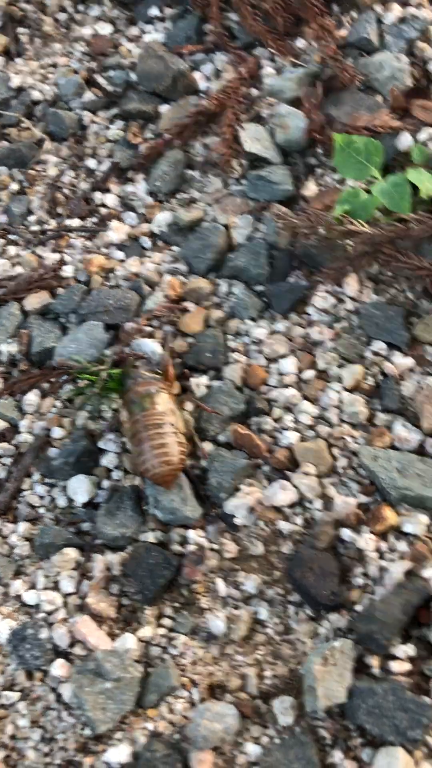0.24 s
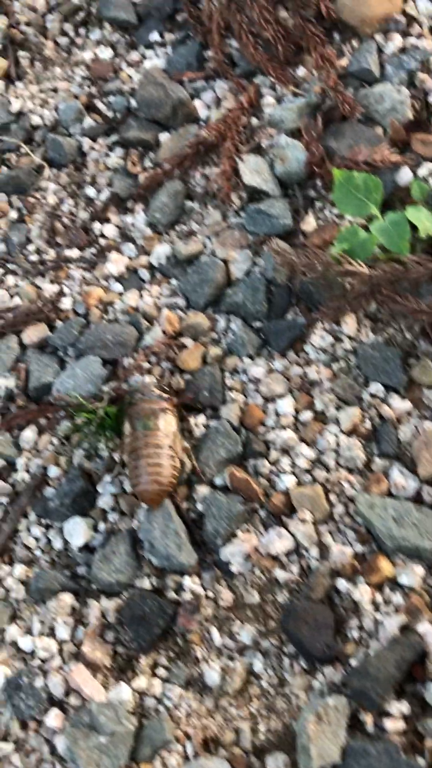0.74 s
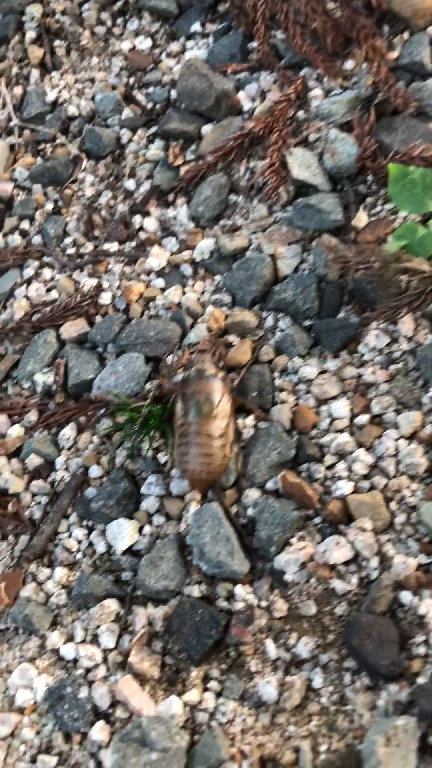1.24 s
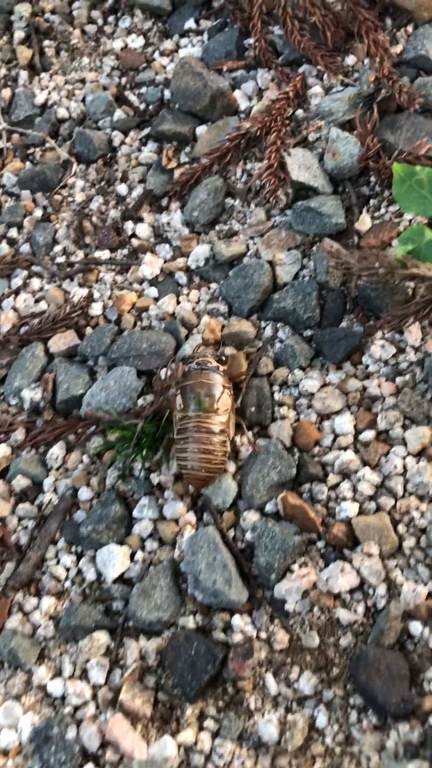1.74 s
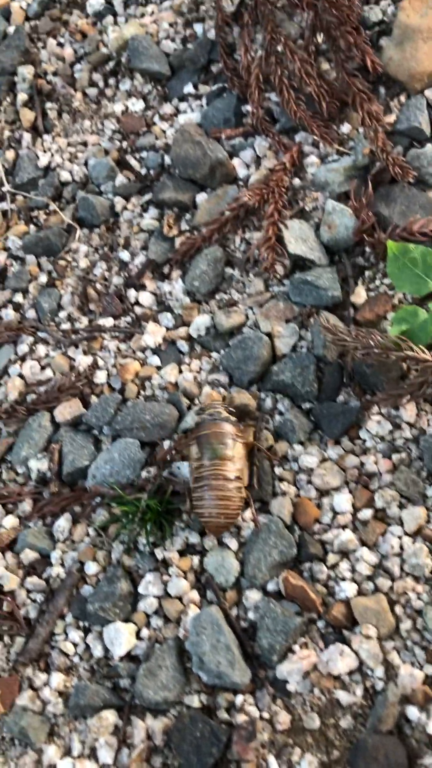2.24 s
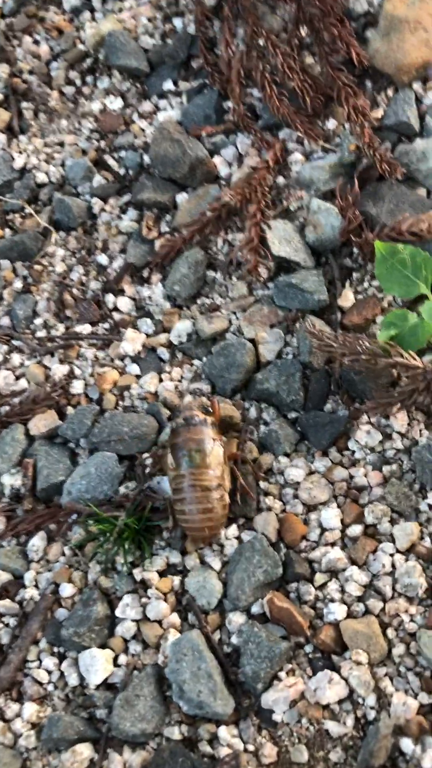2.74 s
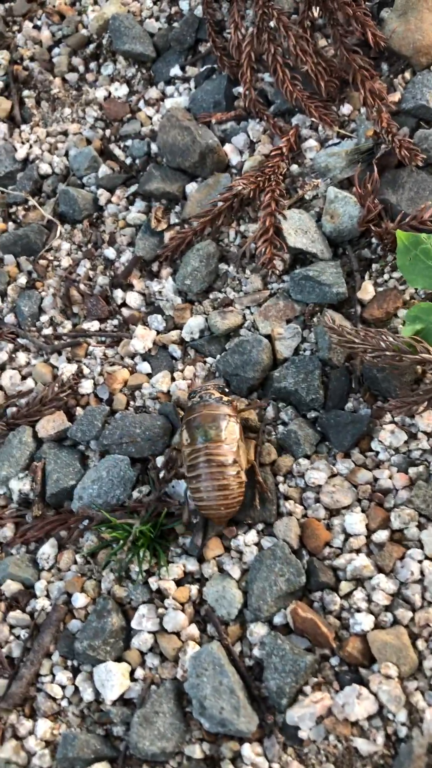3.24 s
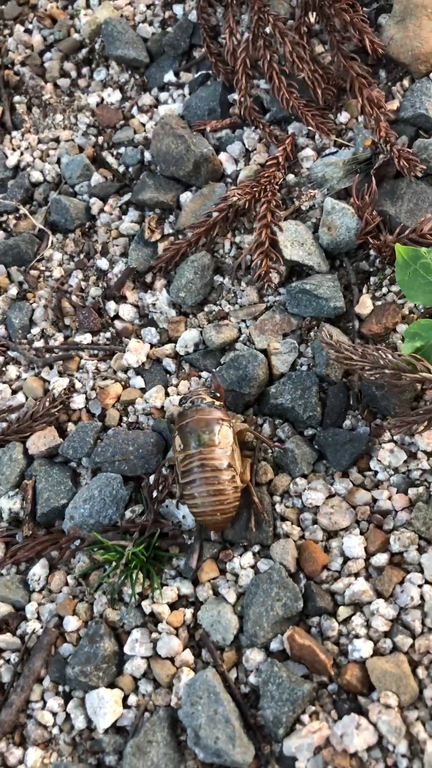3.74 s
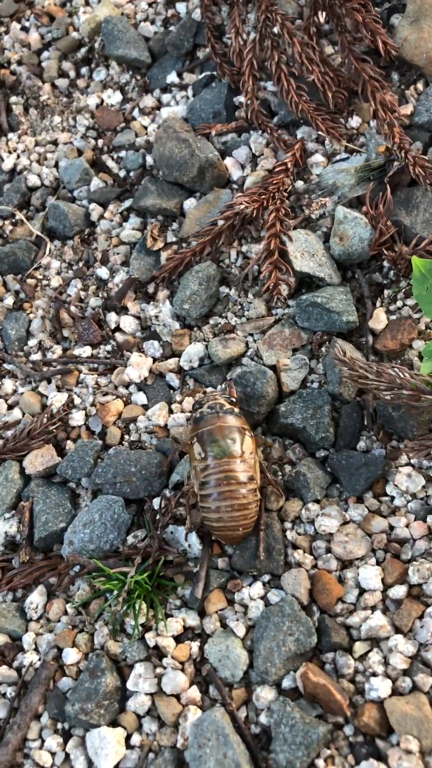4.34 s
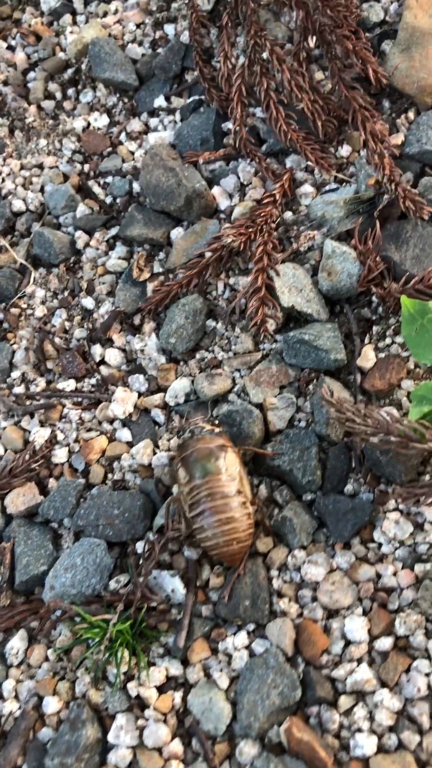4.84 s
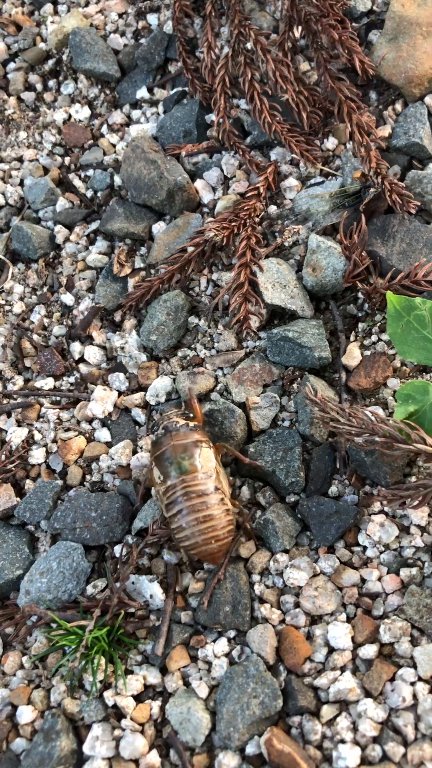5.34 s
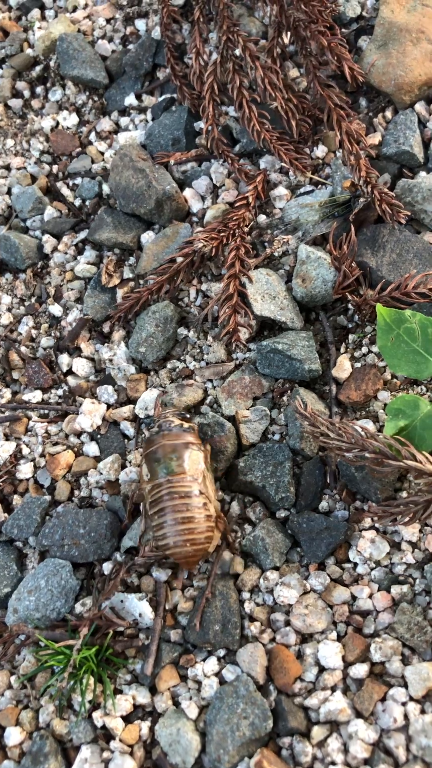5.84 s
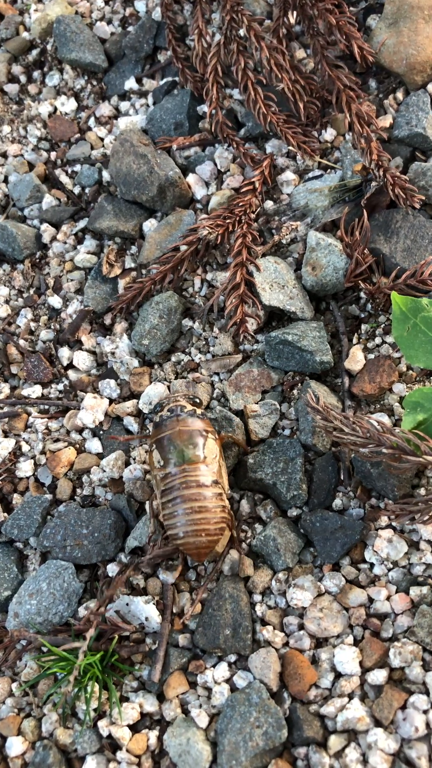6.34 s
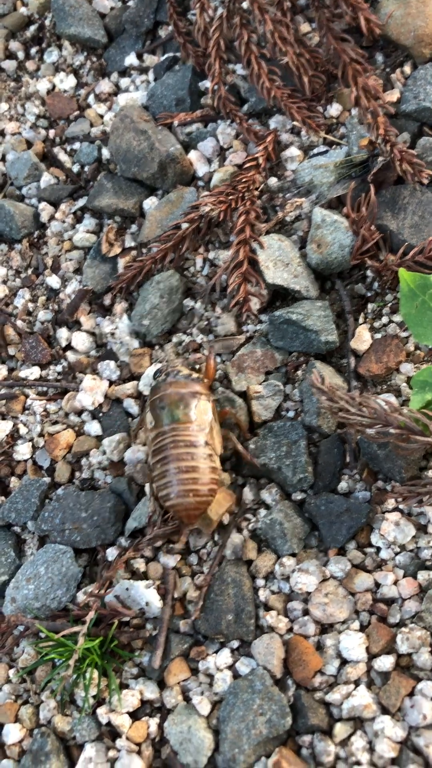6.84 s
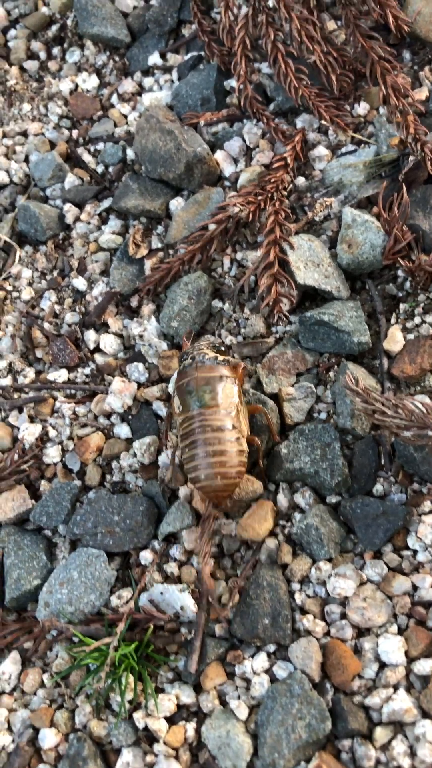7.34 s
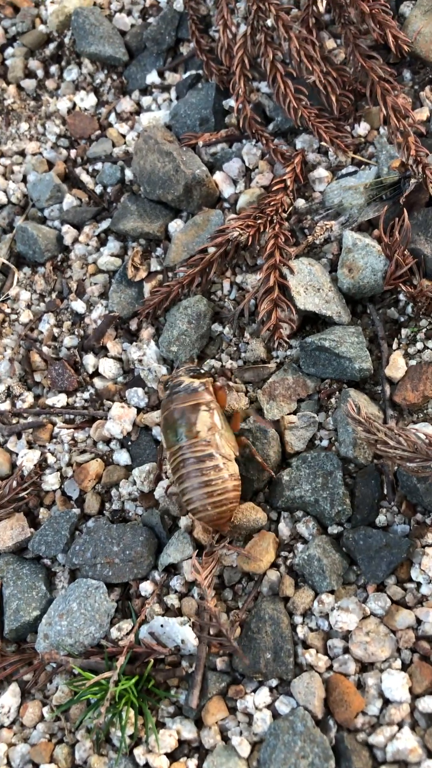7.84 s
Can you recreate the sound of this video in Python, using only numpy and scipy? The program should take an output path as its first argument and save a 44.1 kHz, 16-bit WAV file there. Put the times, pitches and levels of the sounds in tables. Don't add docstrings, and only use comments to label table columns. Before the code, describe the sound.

Outdoors, a shrill high wall of insect buzzing never stops. Brief small creaking beside the microphone opens it, then overlapping cicadas pulse quickly over a blurred distant chorus. Midway the early singers drop away and a nearer one rises in pitch, with deeper throbbing and a raspy edge. Faint road noise hums and rumbles below. Two dry little creaks close it. Captured nearly mono on a phone held low.

```python
import sys
import numpy as np
from scipy import signal
from scipy.fft import rfft, irfft, next_fast_len
from scipy.io import wavfile
from scipy.ndimage import uniform_filter1d

SR = 44100
rng = np.random.default_rng(int(sys.argv[2]) if len(sys.argv) > 2 else 0)


def gain_from_decibels(decibels):
    exponent = np.asarray(decibels, float) / 20
    return 10 ** exponent


def unload_wav(signal):
    wavfile.write(
        sys.argv[1],
        SR,
        np.round(np.clip(np.atleast_2d(signal).T, -1, 1) * 32767).astype(np.int16),
    )


N = 357651
SIZE, HOP = 512, 128
FRAME_S = np.arange(N // HOP + 2) * HOP / SR
BIN_HZ = np.fft.rfftfreq(SIZE, 1 / SR)[:, None]

# f/Hz, level/dB
RUMBLE = [(18, -37), (30, 6), (66, -16), (86, -34), (150, -120)]
THROB = [(34, -26), (58, -1), (115, -1), (150, -35), (250, -120)]
HUM = [(62, -34), (105, -5), (172, 0.5), (313, -4), (382, -10.5), (430, -10.5), (560, -28), (950, -120)]
ROAR = [(220, -12), (380, -6.5), (521, 1), (666, -4.5), (1230, -4.5), (2070, -12.5), (2350, -11.5),
        (3040, -16), (3660, -20.5), (4000, -28), (5200, -45), (8800, -120)]
HISS = [(1000, -30), (1500, 0), (3300, -5), (4500, -32)]
# centre f/Hz, level/dB
ROAD = [
    (42, -64),
    (85, -62),
    (190, -50.5),
    (700, -55),
    (2400, -72),
]
# t/s, half length/s, lift/dB, engine note f/Hz
PASSES = [(0.216, 0.075, 4, 55), (.55, 0.11, -1, 45), (.8, .12, 5, 150), (1.85, 0.11, 0.5, 200),
          (2.564, 0.31, 10.5, 72), (3.45, .3, 4.5, 500), (3.825, 0.26, 6, 90), (3.75, 0.48, 12.5, 2600),
          (5.65, .3, 9.5, 65), (6.153, 0.33, 8.5, 55), (6.9, 0.42, 12, 45), (6.9, 0.94, 3.5, 650),
          (7.95, 0.3, 8, 72)]
REACH_OCTAVES = 1.05

# t/s, level/dB
CHORUS = [(0.0, -42), (0.72, -41), (1.63, -41), (2.3, -40), (3.81, -39), (5.99, -41), (6.44, -39),
          (8.11, -40.5)]
# f/Hz, level/dB
WHINE = [(2120, -49), (3600, -20.5), (4010, -22.5), (4250, -18.5), (4380, -13.5), (4460, -8.5), (4800, -1),
         (5440, -1), (5560, -4), (5840, 1), (6250, -1), (8360, -3.5), (9640, -9.5), (10500, -12.5),
         (13600, -46), (22000, -120)]
FIZZ = [(5290, 1), (9000, -9), (9630, -30), (10600, -3), (14300, 3), (15100, -0.5), (15700, -1)]
FIZZ_UNDER_DB, FIZZ_GAIN_DB_PER_S = -6, 0.71
# start t/s, end t/s, level/dB
JOINERS = [
    (-1, 3.5, -62),
    (6.1, 9, -59.5),
]
# f/Hz, level/dB
JOINERS_VOICE = [(3600, -35), (4000, -1.5), (4300, 5), (4700, -9), (5200, -30)]
JOIN_S, LEAVE_S, JOINERS_IDLE_DB = 0.17, 0.67, -71

# f/Hz, width/Hz, level/dB
CREAK_RINGS = [(3470, 650, -2.5), (5370, 420, 2.5), (10650, 1000, 2.5)]
# start t/s, length/s, peak level/dB, bright ring level at mid-burst/dB
CREAKS = [
    (.2274, .004, -45, -6),
    (.2563, .07, -44, 7),
    (7.8241, .023, -42.5, -2),
    (7.862, .022, -41.5, -5),
]
SLIP_GAP_S, SLIP_SCATTER_DB, DULL_DB = .0095, 0, -9

# t/s, drum clicks f/Hz, belly pumps gained on PUMP_HZ/turns
FIRST_PACE = [(0, 410.5, -.08), (1.2, 412.5, 1.15), (2.3, 413.5, 2.27), (3, 418, 3.05), (4.5, 420, 4.5)]
SECOND_PACE = [(0, 422, .3), (.6, 424, .6), (1.8, 426.5, 1.4), (3.5, 431.5, 2.3), (4.5, 432.5, 2.8)]
THIRD_PACE = [(2.9, 362, 2.35), (3.5, 372.5, 3.3), (4, 378.5, 4.12), (4.7, 382, 4.42), (5.4, 385, 4.41),
              (6.2, 385, 4.1), (6.35, 381.3, 4.0), (7.14, 381.8, 3.68), (8.11, 382, 3.23)]
FOURTH_PACE = [(0, 397, .6), (1.5, 401, .9), (2.2, 398, 1.1), (2.8, 407, 1.3), (3.3, 407, 1.4)]
PUMP_HZ = 14.3
# f/Hz, width/Hz, level/dB
FIRST_BELLY = [(5470, 330, -6), (5660, 320, 4.5), (6130, 400, -0.5), (8600, 800, -3.5),
               (10700, 1300, -16.5)]
SECOND_BELLY = [(6830, 200, -2), (7270, 220, 0), (8950, 300, -7)]
THIRD_BELLY = [(2300, 200, -16), (4590, 250, -9), (4900, 320, -.5), (5740, 260, 1.5), (6080, 300, -5),
               (6500, 400, -7), (8500, 900, -11), (10900, 350, -10), (13000, 1200, -9)]
FOURTH_BELLY = [(4390, 160, -7), (4930, 260, 2), (5680, 420, 2), (6170, 500, -18)]
# f/Hz, width/Hz, level/dB
SHIFTED_BELLY = [(2300, 200, -23), (4960, 250, -1), (5340, 250, 0), (5720, 200, -6.5), (6110, 250, 0),
                 (6500, 300, -8), (7300, 700, -8), (8350, 700, -9), (10400, 800, -14), (13950, 600, -6)]
SHIFT_S, STANCE_DB = 6.28, 3.2
HOLD = .1
FULL_PACE_HZ = 381
# start t/s, end t/s, belly ring level/dB, swell/dB per s, fade-out/s
SONGS = [
    (-1, 4.5, -53, 0.44, .6),
    (-1, 3.9, -61.5, -0.2, .45),
    (3, 9, -49, -0.1, .5),
    (-1, 3.3, -60, 3, 0.31),
]
# level above ring before its turn/dB, after it/dB, turn t/s, centre f/Hz, climb/Hz per s
FIZZES = [
    (-1, -11, 2.8, 15600, -290),
    (2, -5, 2.9, 12000, 3),
    (-19, -1, 4.75, 13200, 500),
    (-13, -8.5, 1.3, 11700, 30),
]
FADE_IN_S, FADE_DB, TURN_S, TOP_FIZZ_HZ = 0.24, -26, .45, 15200

# t/s, centre f/Hz
SPLITS = [(0.074, 6050), (2.745, 13180), (2.998, 4750), (3.048, 13180), (3.814, 12450), (3.815, 8900),
          (3.859, 5170), (3.931, 15100), (4.138, 6500), (4.165, 13130), (4.534, 6220), (4.534, 13780),
          (4.626, 14430), (4.835, 13050), (4.839, 6290), (5.023, 5120), (5.833, 15150), (5.835, 8260),
          (6.019, 5770), (6.02, 14470), (6.206, 8250), (7.229, 8260)]
SPLIT_WIDTH_HZ, SPLIT_DB, SPLIT_DB_PER_OCTAVE = 1300, -51.5, -4
EDGE_HZ = 15730


def evened(x):
    return x / np.sqrt(np.mean(x ** 2) + 1e-20)


def ramp(t, s):
    return np.clip(t / s, 0, 1)


def columns(rows, t):
    s, *values = np.transpose(rows)
    return [np.interp(t, s, v) for v in values]


def drift(shape, smooth, axis=-1):
    rough = rng.standard_normal(shape)
    return evened(uniform_filter1d(uniform_filter1d(rough, smooth, axis), smooth, axis))


def spectra(x):
    return signal.stft(x, nperseg=SIZE, noverlap=SIZE - HOP)[2]


def noise(spectrum, level_db, patchy_db, smooth, combs_db=0., count=0):
    frames, hz = N // 512 + 5, np.fft.rfftfreq(2048, 1 / SR)[:, None]
    f, db = np.transpose(spectrum)
    field_db = np.interp(np.log(hz + 1), np.log(f), db, left=-120, right=-120)
    patches = evened(uniform_filter1d(drift((len(hz), frames), smooth), size=5, axis=0))
    field_db = field_db + patchy_db * patches
    teeth = np.zeros(field_db.shape)
    for pace in rng.uniform(375, 440, count):
        order = hz / (pace * (1 + 0.0052 * drift(frames, 150)))
        overtone = np.minimum(order + .5, 59).astype(int)
        strength = np.maximum(drift((60, frames), 40), 0)[overtone, np.arange(frames)]
        teeth += strength * np.exp(-((order - np.round(order)) * pace / 25) ** 2)
    grain = (rng.standard_normal((frames, len(hz), 2)) @ [1, 1j]).T
    z = grain * gain_from_decibels(field_db) * np.sqrt(1 + gain_from_decibels(2 * combs_db) * teeth)
    return gain_from_decibels(level_db) * evened(signal.istft(z, nperseg=2048, noverlap=1536)[1][:N])


def traffic():
    t = np.arange(N) / SR
    at, half, lift_db, note_hz = np.transpose(PASSES)
    coarse = t[::200]
    near = np.array([np.interp(t, coarse, np.exp(-((coarse - s) / h) ** 2)) for s, h in zip(at, half)])
    total = np.zeros(N)
    for colour, (hz, idle_db) in zip((RUMBLE, THROB, HUM, ROAR, HISS), ROAD):
        reach = np.exp(-(np.log2(hz / note_hz) / REACH_OCTAVES) ** 2)
        total += noise(colour, idle_db + lift_db * reach @ near, 0.69, 20)
    return total


def chorus():
    t = np.arange(N) / SR
    whine_db = columns(CHORUS, t)[0]
    fizz_db = whine_db + FIZZ_UNDER_DB + FIZZ_GAIN_DB_PER_S * t
    joined_db = JOINERS_IDLE_DB
    for start, end, db in JOINERS:
        present = ramp(t - start, JOIN_S) * ramp(end + LEAVE_S - t, LEAVE_S)
        joined_db = joined_db + (db - JOINERS_IDLE_DB) * present
    joined = noise(JOINERS_VOICE, joined_db, 1.6, 20)
    whine = noise(WHINE, whine_db - 1.63, 0.8, 30, combs_db=3.4, count=3)
    fizz = noise(FIZZ, fizz_db - 1.8, 1.7, 20, combs_db=5.5, count=3)
    return whine + fizz + joined


def creaks():
    out, t = np.zeros(N), np.arange(400) / SR
    rings = []
    for f, w, db in CREAK_RINGS:
        swell_and_fade = np.e * np.pi * w * t * np.exp(-np.pi * w * t)
        rings.append(gain_from_decibels(db) * np.sin(2 * np.pi * f * t) * swell_and_fade)
    for (start, length, db, bright_db), luck in zip(CREAKS, rng.random((len(CREAKS), 24, 2))):
        gaps = SLIP_GAP_S * (.75 + luck[:, 0] / 2)
        after = np.cumsum(gaps) - gaps[0]
        for s, scatter in zip(after[after <= length], luck[:, 1]):
            shine_db = DULL_DB + (bright_db - DULL_DB) * np.sin(np.pi * (s / length) ** .75)
            strength = gain_from_decibels(db - 2 * SLIP_SCATTER_DB * scatter * (s > 0))
            slip = rings[0] + gain_from_decibels(shine_db) * sum(rings[1:])
            out[round((start + s) * SR):][:len(t)] += strength * slip
    blur = rng.standard_normal(2000) * gain_from_decibels(-60 * np.arange(2000) / SR / 0.083)
    return out + gain_from_decibels(-4.5) * signal.oaconvolve(out, blur / np.linalg.norm(blur))[:N]


def body(modes, tight=1):
    power = 0
    for f, w, db in modes:
        power = power + gain_from_decibels(2 * db) / (1 + (2 * (BIN_HZ - f * tight) / w) ** 2) ** 2
    return evened(np.sqrt(power))


def effort_of(song, fizz):
    start, end, db, swell, fade = song
    before_db, after_db, turn, hz, climb = fizz
    t = np.arange(0, min(end, N / SR + .05), .02)
    missing = 2 - ramp(t - start, FADE_IN_S) - ramp(end - t, fade) ** .5
    ring_db = np.where(t < start, -120, db + swell * (t - start) + FADE_DB * missing)
    above_db = before_db + (after_db - before_db) * (1 + np.tanh((t - turn) / TURN_S)) / 2
    centre_hz = np.minimum(hz + climb * (t - start), TOP_FIZZ_HZ)
    return np.transpose([t, ring_db, ring_db + above_db, centre_hz])


def drum_clicks(pace, n, jitter, tug):
    t = np.arange(n) / SR
    hz, gained = columns(pace, t)
    eased_tug = tug * (1 - .8 * ramp(t - 5.2, 1.1))
    bend = -eased_tug * np.sin(2 * np.pi * (PUMP_HZ * t + gained))
    half = np.pi * np.cumsum(hz * (1 + bend + jitter * drift(n, 600))) / SR
    clicks = np.sin(83 * half) / (np.sin(half) + 1e-9)
    return clicks / np.sqrt(SR / 2 / hz), half


def cicada(pace, effort, belly, rough, fizz_rough, jitter, depth, fizz_depth, width_hz, lag, tug,
           split_s=None):
    n = min(N, int(effort[-1][0] * SR))
    clicks, half = drum_clicks(pace, n, jitter, tug)
    leaves = np.roll(irfft(np.exp(3j * drift(1025, 6))), 1024)
    clear = spectra(signal.oaconvolve(clicks, leaves)[1024:n + 1024])
    hiss = spectra(rng.standard_normal(n))
    t = FRAME_S[:hiss.shape[1]]
    if split_s:
        opposed = clicks * np.cos(half) * np.sqrt(2)
        answer = spectra(signal.oaconvolve(opposed, leaves)[1024:n + 1024])
        clear = np.where((BIN_HZ > 13500) & (t > split_s), answer, clear)
    pump = PUMP_HZ * t + columns(pace, t)[1]
    ring_db, fizz_db, centre = columns(effort, t)

    ease = 1 - .25 * ramp(t - SHIFT_S, .4)
    sweep = (BIN_HZ - centre) / 12000
    fizz = gain_from_decibels(fizz_db + ease * fizz_depth * np.cos(2 * np.pi * (pump - sweep)))
    fizz = fizz / (1 + (2 * (BIN_HZ - centre) / width_hz) ** 2) * np.sqrt(2 * SR / np.pi / width_hz)

    held = (t > SHIFT_S) & (abs(BIN_HZ - 5750) > 170)
    low = np.clip((7600 - BIN_HZ) / 800, 0, 1)
    late = (lag + .05 * (t > SHIFT_S) + 0.11 * held) * low
    wave = np.cos(2 * np.pi * (pump - late)) - HOLD * held
    swing_db = depth * (BIN_HZ > 3000) * np.minimum(wave, 1 - held)
    ring = belly[:, :len(t)] * gain_from_decibels(ring_db + swing_db)

    share = np.clip((rough * ring + fizz_rough * fizz) / (ring + fizz), 0, 1)
    shimmer = gain_from_decibels(2.2 * np.clip(BIN_HZ / 12000, 0, 1) * drift(ring.shape, 40))
    z = (np.sqrt(1 - share) * clear * shimmer + np.sqrt(share) * hiss) * np.hypot(ring, fizz)
    return np.pad(signal.istft(z, nperseg=SIZE, noverlap=SIZE - HOP)[1][:n], (0, N - n))


def singers():
    steady = np.ones(len(FRAME_S))
    shifted = np.clip((FRAME_S - SHIFT_S) / .15 + .5, 0, 1)
    tight = np.minimum(columns(THIRD_PACE, FRAME_S)[0] / FULL_PACE_HZ, 1)
    third_belly = (1 - shifted) * body(THIRD_BELLY, tight)
    third_belly = third_belly + shifted * gain_from_decibels(STANCE_DB) * body(SHIFTED_BELLY)
    efforts = [effort_of(song, fizz) for song, fizz in zip(SONGS, FIZZES)]
    first = cicada(FIRST_PACE, efforts[0], steady * body(FIRST_BELLY), rough=0.25, fizz_rough=0.5,
                   jitter=0.00116, depth=2.8, fizz_depth=4.6, width_hz=2200, lag=0.56, tug=0.0012)
    second = cicada(SECOND_PACE, efforts[1], steady * body(SECOND_BELLY), rough=0.2, fizz_rough=0.36,
                    jitter=0.00063, depth=2.3, fizz_depth=1.7, width_hz=3500, lag=0.52, tug=0.0011)
    fourth = cicada(FOURTH_PACE, efforts[3], steady * body(FOURTH_BELLY), rough=0.38, fizz_rough=.7,
                    jitter=0.00202, depth=0.78, fizz_depth=1.5, width_hz=1500, lag=0.3, tug=.004)
    third = cicada(THIRD_PACE, efforts[2], third_belly, rough=.18, fizz_rough=.55, jitter=.0008,
                   depth=5.5, fizz_depth=8.5, width_hz=1300, lag=.4, tug=.005, split_s=6.7)
    return first + second + fourth + third


def scene():
    return np.tile(traffic() + chorus() + creaks() + singers(), (2, 1))


def top_cut(x):
    return signal.sosfilt(signal.butter(12, 16920, fs=SR, output="sos"), x)


def record(dry):
    size = next_fast_len(N)
    hz = np.fft.rfftfreq(size, 1 / SR)
    response = (hz < EDGE_HZ) / (1 + (36 / (hz + 1)) ** 7)
    heard = irfft(rfft(dry, size) * response, size)[:, :N]
    side, hz = np.zeros(N), np.fft.rfftfreq(2048, 1 / SR)
    for s, centre in SPLITS:
        db = SPLIT_DB + SPLIT_DB_PER_OCTAVE * np.log2(centre / 6000)
        inside = abs(hz - centre) < SPLIT_WIDTH_HZ / 2
        band = irfft(rfft(rng.standard_normal(2048)) * inside)
        side[round(s * SR) - 1024:][:2048] += gain_from_decibels(db) * evened(band * signal.windows.hann(2048))
    return top_cut(heard + side * [[1], [-1]])


dry = scene()
out = record(dry)
unload_wav(out)
```